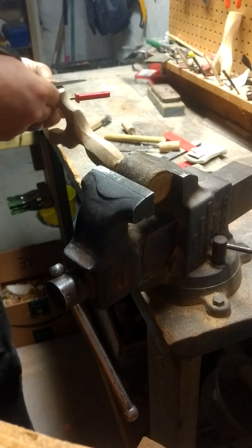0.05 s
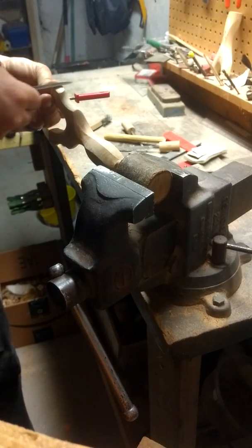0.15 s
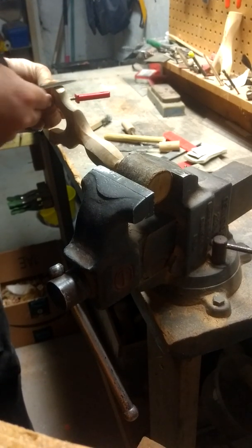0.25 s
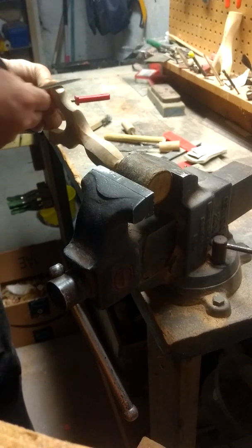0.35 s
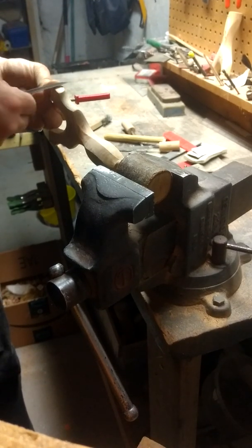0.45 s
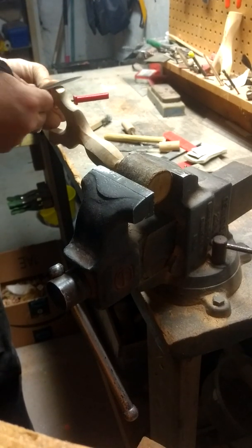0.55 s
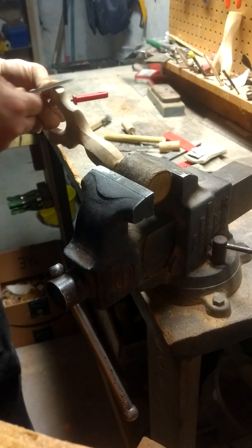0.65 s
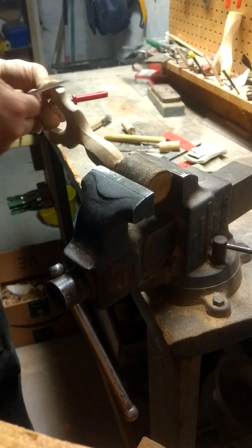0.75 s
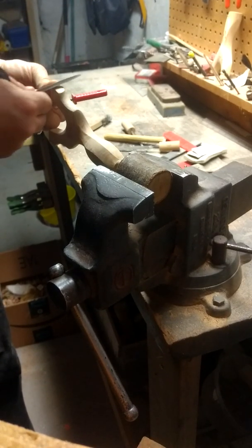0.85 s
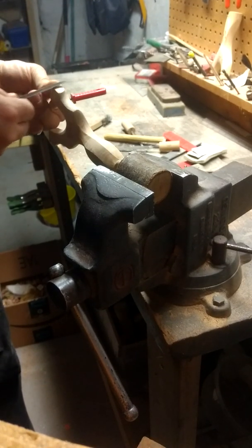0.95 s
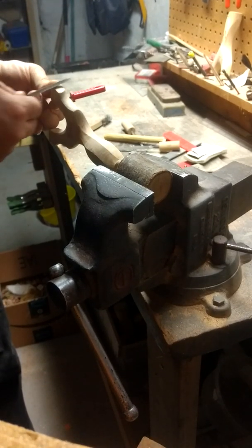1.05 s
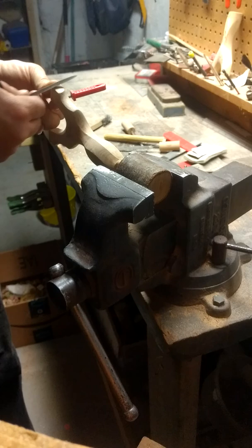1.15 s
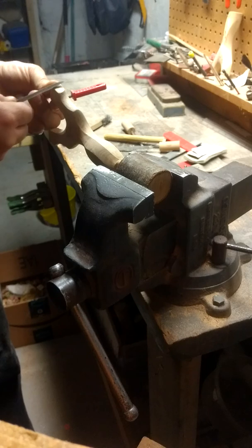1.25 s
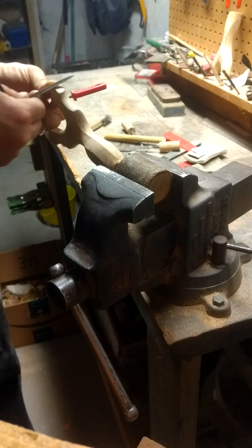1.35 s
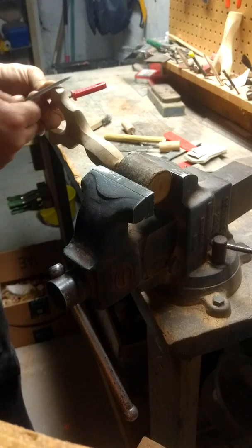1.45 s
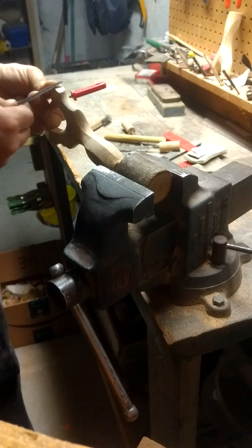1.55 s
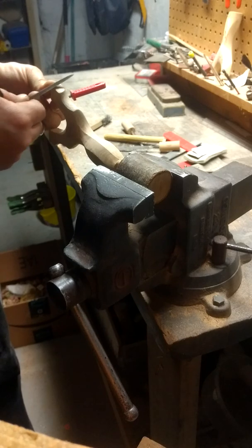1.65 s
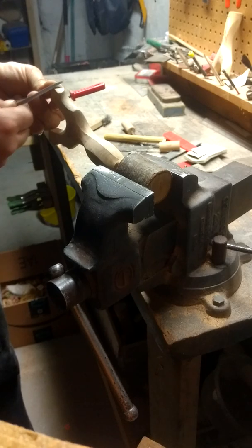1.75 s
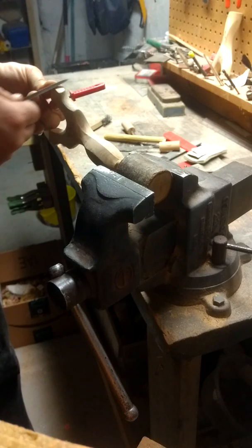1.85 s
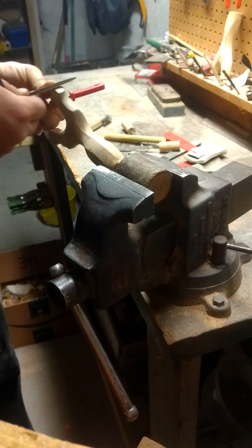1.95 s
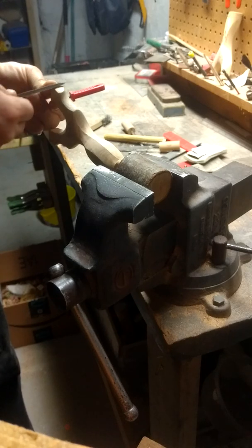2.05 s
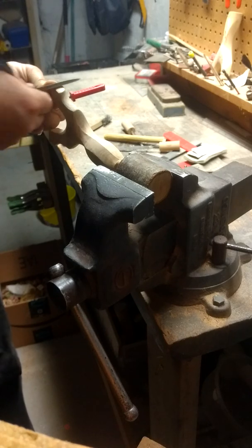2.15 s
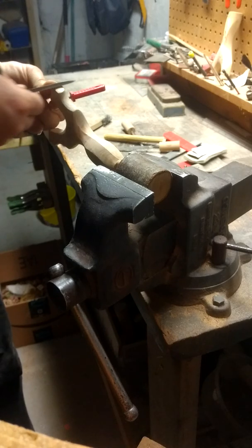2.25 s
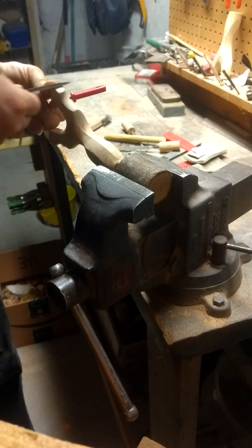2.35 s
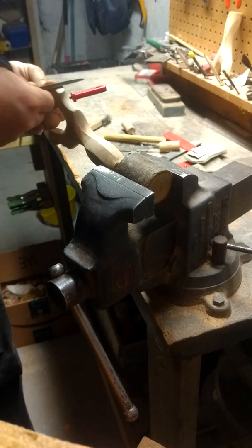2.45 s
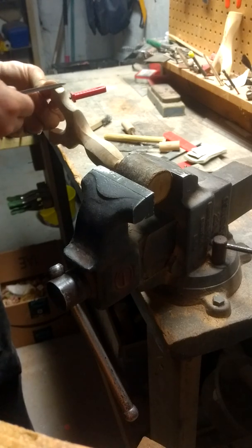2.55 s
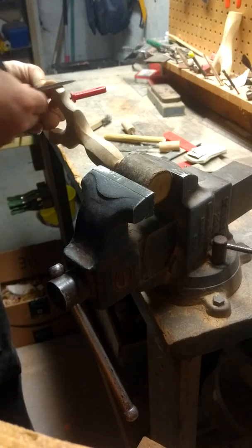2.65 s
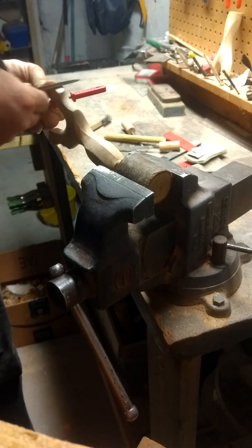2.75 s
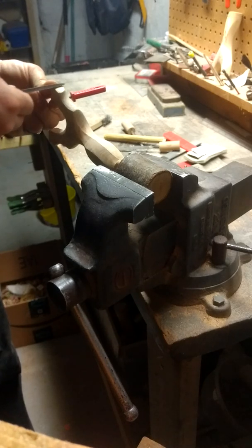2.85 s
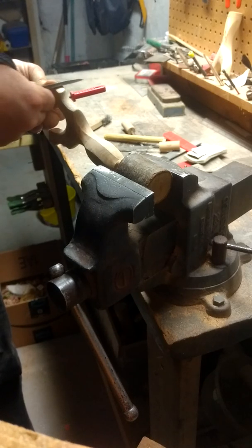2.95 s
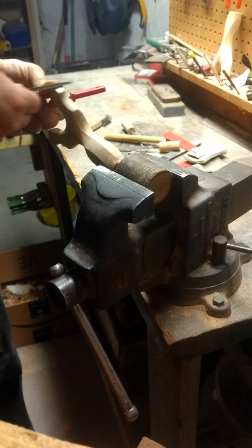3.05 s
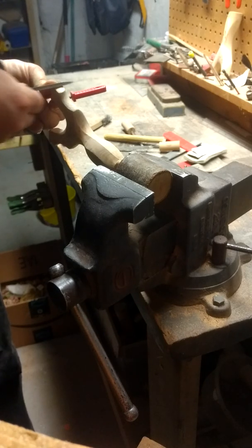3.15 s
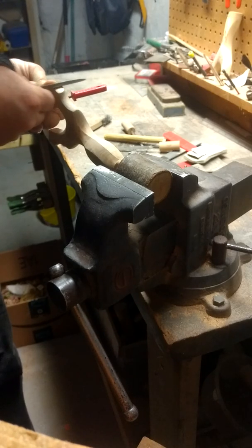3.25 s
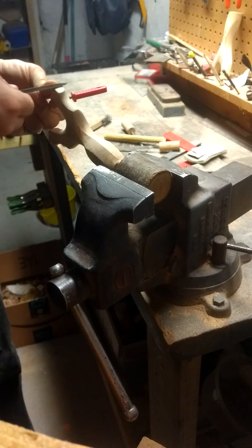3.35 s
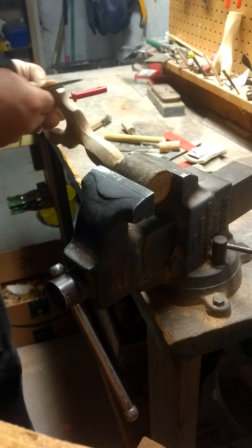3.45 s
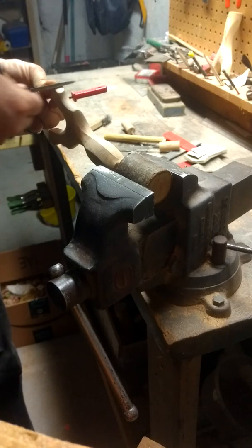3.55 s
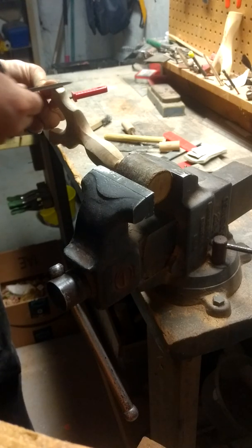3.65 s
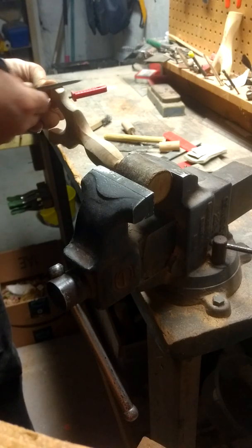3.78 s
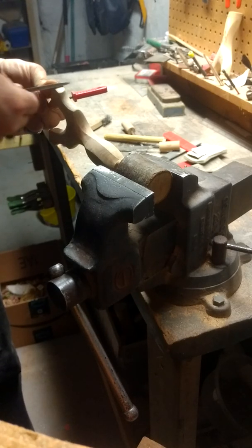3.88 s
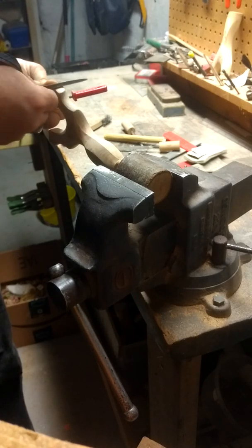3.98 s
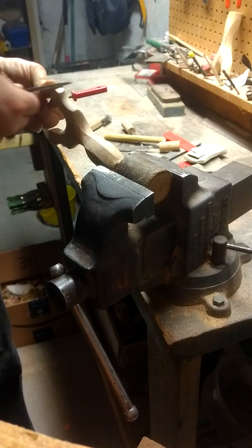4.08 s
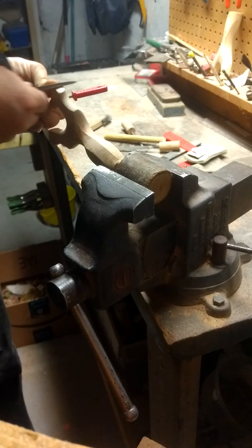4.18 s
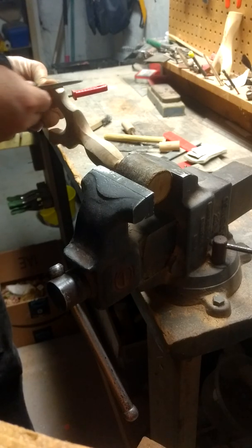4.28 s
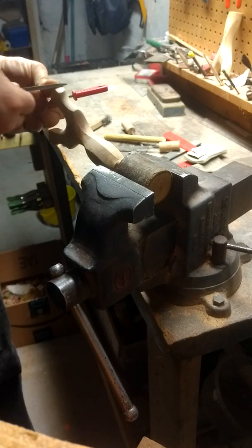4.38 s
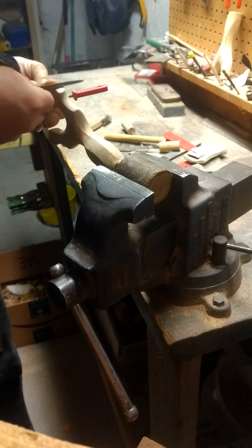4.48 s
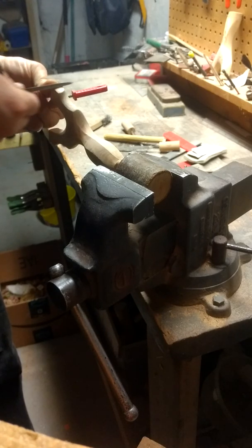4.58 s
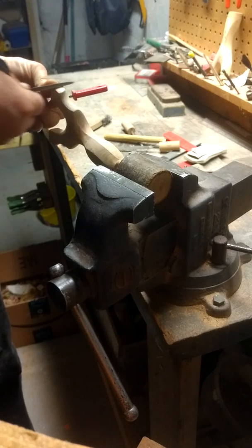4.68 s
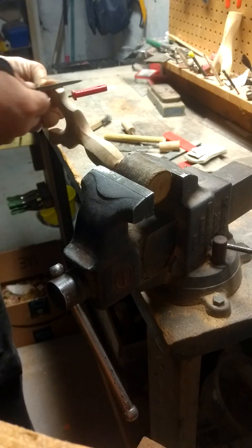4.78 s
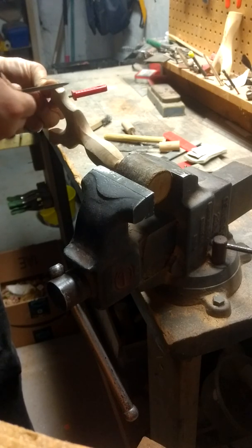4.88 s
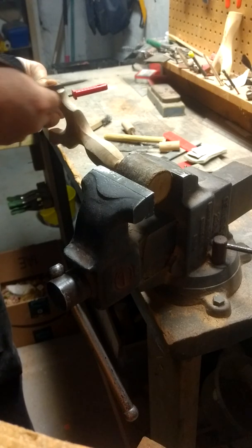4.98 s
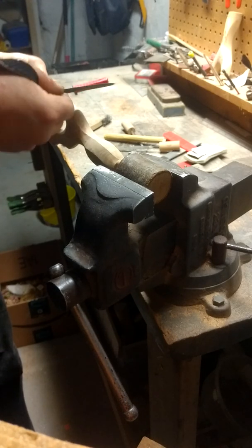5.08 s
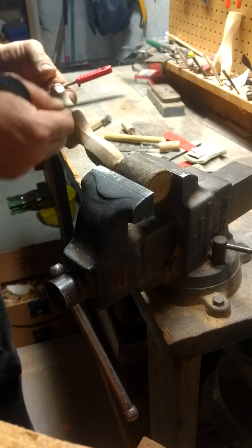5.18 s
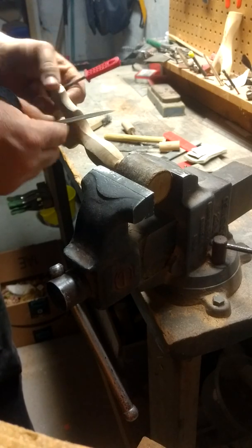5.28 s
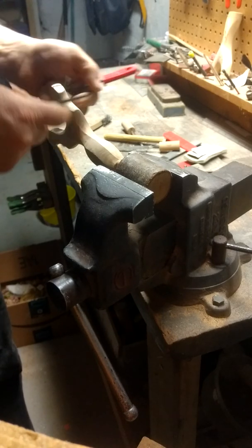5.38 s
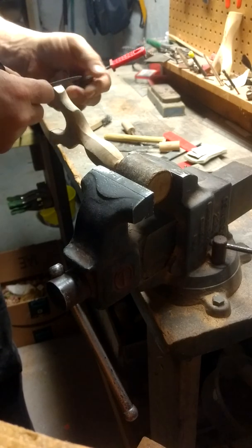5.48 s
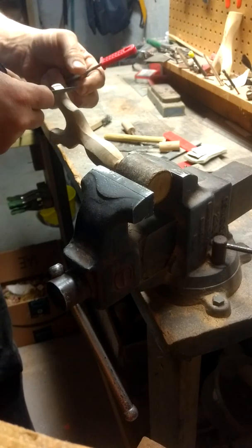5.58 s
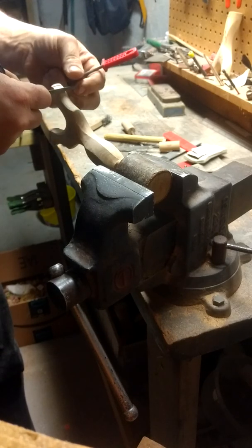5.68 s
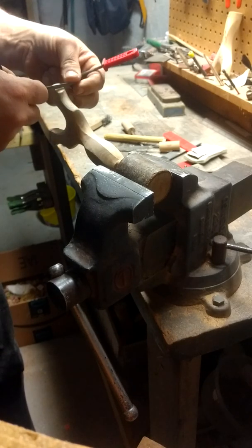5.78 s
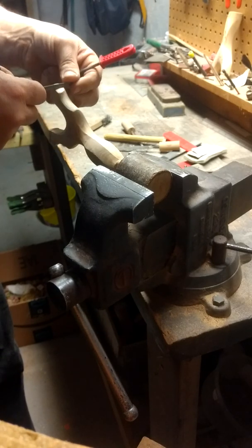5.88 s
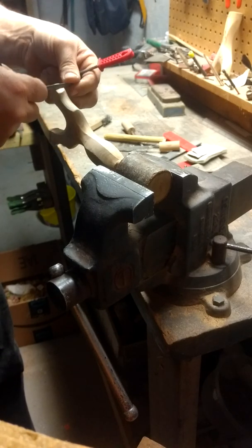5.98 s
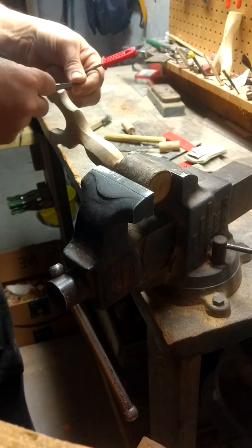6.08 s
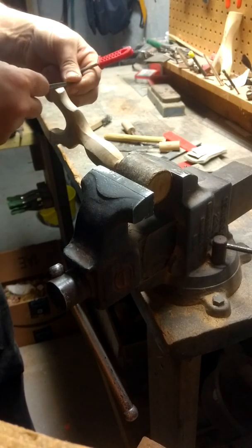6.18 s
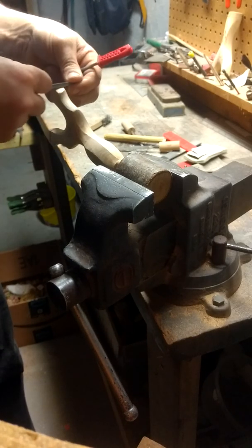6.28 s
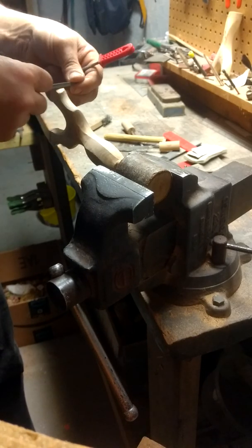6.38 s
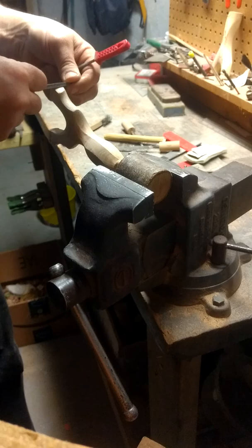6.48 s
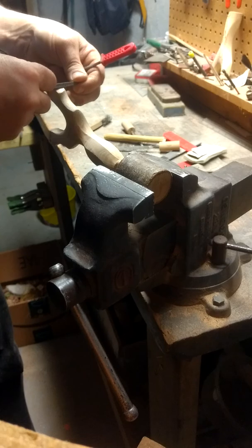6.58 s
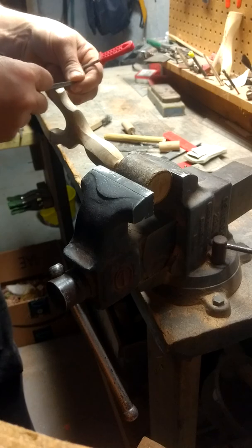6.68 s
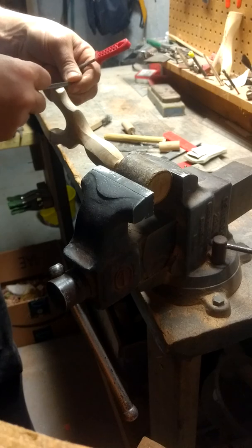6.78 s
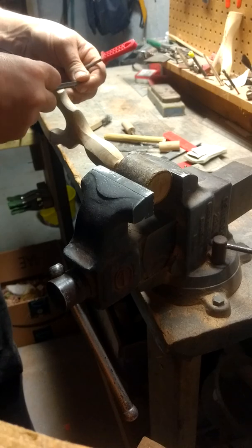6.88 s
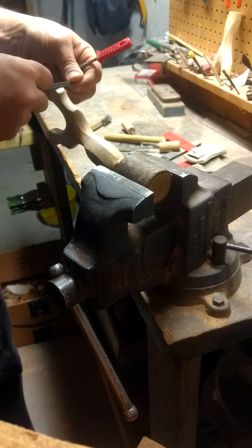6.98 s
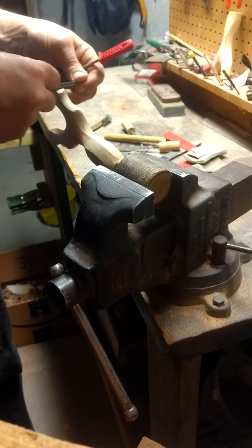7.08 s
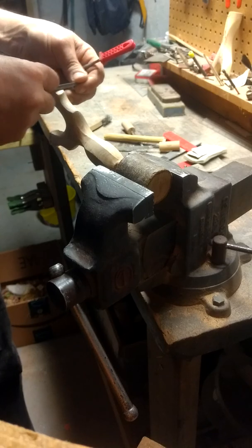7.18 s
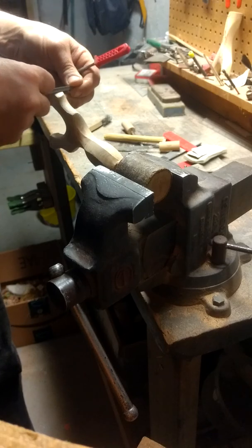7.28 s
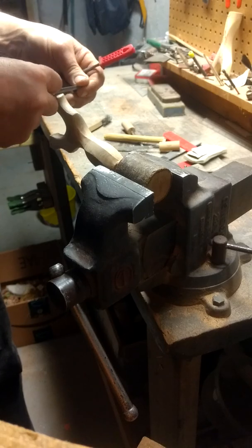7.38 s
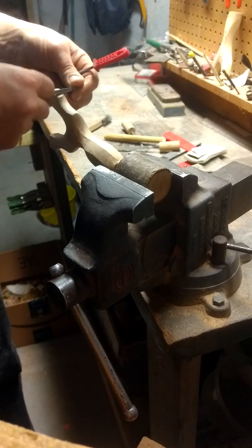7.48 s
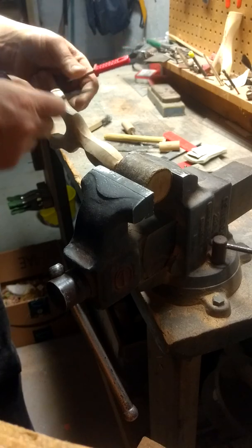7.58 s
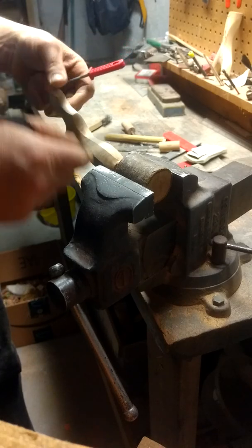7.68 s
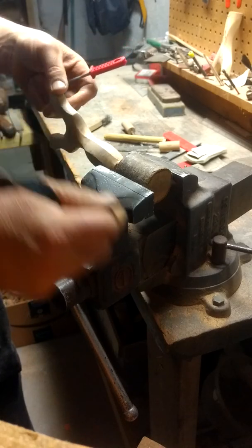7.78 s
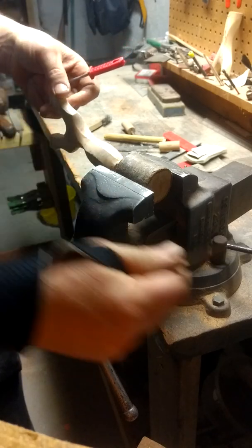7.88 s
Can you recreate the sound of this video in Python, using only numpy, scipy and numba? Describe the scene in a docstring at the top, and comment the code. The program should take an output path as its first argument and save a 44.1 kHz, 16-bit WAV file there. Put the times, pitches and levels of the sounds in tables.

```python
"""Hand file on clamped carved wood

A fine file is pushed and pulled over a carved wooden piece held in a bench vise, pauses, then goes on at a spot
where its rasp is quieter. Dense random grit is coloured into rasp and scrape; coarser grit and knocks ring
damped modes of the piece, and a burst of grit rings the file as it lifts off. A soft broad hiss sounds while
the file is lifted. Bass-heavy workshop air, short echoes and a stepped phase spread make a wide stereo picture."""
import sys
import numpy as np
from scipy import signal
from scipy.fft import rfft, irfft, next_fast_len
from scipy.io import wavfile
from scipy.ndimage import uniform_filter1d
from numba import njit

SR = 44100
rng = np.random.default_rng(int(sys.argv[2]) if len(sys.argv) > 2 else 0)


def to_wav(s):
    """Save 16-bit WAV."""
    ch = np.atleast_2d(s).T  # columns
    pcm = np.round(np.clip(ch, -1, 1) * 32767)  # PCM
    wavfile.write(sys.argv[1], SR, pcm.astype(np.int16))


N = 349713  # samples
MOVE_S = 5.25  # the hands go to the second spot
BLOCK = 32  # samples between updates of a mode
# frequency grid for the spectral filters, kept just above zero for its logarithm
HALF_SIZE = next_fast_len(N // 2 + 1)
HZ = np.arange(HALF_SIZE + 1.) * SR / 2 / HALF_SIZE + 1e-3

# file strokes, a push first at each spot, then pull and push in turn; levels before the layer trims:
# start_s [s], rasp_db [dB], ring_db [dB, ring of the piece]
STROKES = [(0.0, -42, -28.5), (0.151, -43, -34), (0.279, -42.5, -30.5), (0.403, -45.5, -37.5),
           (0.54, -42.5, -30.5), (0.659, -45.5, -33.5), (0.802, -42.5, -31), (0.937, -46, -28),
           (1.072, -45, -29.5), (1.209, -47, -35), (1.354, -43, -28), (1.483, -47, -30),
           (1.627, -43.5, -29), (1.75, -46, -31), (1.888, -41.5, -29), (2.015, -47.5, -32),
           (2.145, -42, -31), (2.28, -43.5, -32), (2.404, -40.5, -30.5), (2.527, -43, -32),
           (2.672, -39.5, -30), (2.804, -42, -36.5), (2.942, -38.5, -30), (3.057, -43.5, -33),
           (3.193, -39, -28), (3.325, -41, -35), (3.45, -39, -30.5), (3.578, -41, -32.5), (3.701, -39, -25),
           (3.833, -42, -30.5), (3.958, -38.5, -27.5), (4.082, -41, -32), (4.214, -39, -26.5),
           (4.343, -41, -30), (4.475, -39, -25), (4.587, -42.5, -31.5), (4.724, -39, -25),
           (4.844, -43.5, -31.5), (4.968, -39, -28), (6.053, -58, -38.5), (6.195, -57.5, -36.5),
           (6.328, -52, -31.5), (6.463, -58, -35.5), (6.594, -46.5, -24.5), (6.712, -53.5, -31),
           (6.854, -48.5, -26), (7.004, -55.5, -33.5), (7.12, -48.5, -24.5), (7.24, -52, -30),
           (7.352, -50.5, -29.5), (7.503, -57, -42)]
# stereo tilt: frequency_hz [Hz], left_minus_right_db [dB]
LEFT_TILT = [(40, -4.5), (90, 3.5), (250, 7), (450, 1), (1200, -2.5), (2500, 1.5), (5000, 2.5), (9000, -3),
             (16000, 0)]


def undb(db):
    """Decibels to an amplitude factor."""
    return 10 ** (np.asarray(db) / 20)


def unit(x):
    """Scale to an RMS of 1."""
    return x / np.sqrt(np.mean(x ** 2))


def shape(points):
    """Value at every frequency from (Hz, value) points, straight over log frequency."""
    hz, value = np.transpose(points)
    return np.interp(np.log(HZ), np.log(hz), value)


def colour(x, db, turn=0):
    """Filter by a level in dB and a phase turn in radians at every frequency."""
    size = 2 * len(HZ) - 2
    response = undb(db) * np.exp(1j * turn)
    return irfft(rfft(x, size) * response, size)[:N]


def walk(rate, step=1):
    """Random levels held 1 / rate s and slewed twice, read every step samples; spread near 1."""
    held = np.repeat(rng.standard_normal(int(N / SR * rate) + 2), 8)
    slewed = 1.3 * uniform_filter1d(uniform_filter1d(held, 8), 8)
    return np.interp(np.arange(0, N, step) * (8 * rate / SR), np.arange(len(slewed)), slewed)


def grit(rate, scatter_db):
    """Clicks at random moments, as of tearing fibres, rate per second, a few much harder than the rest."""
    tear = rng.random(N) < rate / SR
    hardness = undb(scatter_db * rng.exponential(size=N))
    return unit(tear * rng.standard_normal(N) * hardness)


@njit
def mode(x, pole, gain, block):
    """One damped mode as a complex resonator; pole and drive gain change block by block."""
    y, z = np.empty(len(x)), 0j
    for i in range(len(x)):
        z = z * pole[i // block] + gain[i // block] * x[i] + 1e-18
        y[i] = z.imag
    return y


def ring(x, modes, grip, drift, patchy_db):
    """Sum of modes, signs alternating; the grip damps and detunes them, the contact favours now one, now another."""
    out = 0
    grip = grip[::BLOCK]
    moved = np.arange(0, N, BLOCK) > MOVE_S * SR
    for k, (hz, t60, *spot_db) in enumerate(modes):
        db = np.where(moved, spot_db[-1], spot_db[0]) + patchy_db * walk(12, BLOCK)
        pitch = hz * (1 + drift * grip * walk(9, BLOCK))
        decay = np.log(1000) / (t60 * (1 - grip) * SR)
        pole = np.exp(2j * np.pi * pitch / SR - decay)
        gain = undb(db) / np.sqrt(t60 * SR)
        out = out + (-1) ** k * mode(x, pole, gain, BLOCK)
    return out


def effort(sharp, rest):
    """Gains in time of rasp, scrape, ring and sway: each stroke speeds up, tops and slows; rest stays at the turns."""
    # hand movement, spot by spot, push then pull: top_place [0-1 of the stroke],
    # moving_share [of the time to the next stroke], peaked [power of the speed],
    # scrape_db [dB above the mean of rasp and ring], sway_db [dB above the ring]
    gait = [
        [(.33, .96, 1.02, -7.5, 0.5), (.42, .96, 1, -7, 0.1)],
        [(.45, 0.925, 1.4, -2.5, 2), (0.3, 0.94, 0.71, -5.5, -1.5)],
    ]
    # slow change of the sway, added to its level above: time_s [s], level_db [dB]
    sway_curve = [(0, -12), (.4, -10.5), (.6, -5.5), (1.1, -6), (1.8, -7.5), (2.7, -9), (3.45, -3),
                  (3.75, -11), (4.1, -6), (4.5, -12), (4.75, -7), (5.1, -12.5), (6.05, -4), (6.7, -6),
                  (7, -10.5), (7.6, -5.5)]
    last_room_s = .14  # time given to the last stroke at each spot
    out = np.zeros((4, N))
    first = sum(s < MOVE_S for s, *_ in STROKES)  # strokes at the first spot
    for k, (s, rasp_db, ring_db) in enumerate(STROKES):
        spot = int(k >= first)
        top, moving, peaked, scrape_db, sway_db = gait[spot][(k - spot * first) % 2]
        is_last = k + 1 in (first, len(STROKES))
        room_s = last_room_s if is_last else STROKES[k + 1][0] - s
        i, n = int(s * SR), int(min(moving, 1) * room_s * SR)
        way = np.interp(np.arange(n) / n, [0, np.clip(top, .1, .9), 1], [0, .5, 1])
        speed = rest + (1 - rest) * np.sin(np.pi * way) ** sharp
        sway_db = ring_db + sway_db + np.interp(s, *np.transpose(sway_curve))
        db = [rasp_db, (rasp_db + ring_db) / 2 + scrape_db, ring_db, sway_db]
        out[:, i:i + n] = undb(db)[:, None] * unit(speed ** peaked)
    return uniform_filter1d(out, 300)


def peaks(shift):
    """Resonant peaks in dB at every frequency, all moved by a factor."""
    # file and piece together: centre_hz [Hz, before the shift], width_hz [Hz, at half the dB], height_db [dB]
    contact_peaks = [(1043, 71, 3.5), (1238, 160, 5.5), (1526, 130, 6), (1830, 96, 7), (2046, 76, 10.5),
                     (2500, 195, 10.5), (2980, 64, 3.5), (3430, 253, 9), (4670, 184, 13.5), (6420, 490, 11),
                     (8050, 640, 11), (12800, 630, 6.5)]
    return sum(db / (1 + (2 * (HZ - hz * shift) / width) ** 2) for hz, width, db in contact_peaks)


def blows(growth):
    """One impulse for each knock, its level growing by growth dB per dB."""
    # teeth catch, or the file touches down: time_s [s], level_db [dB, before growth and layer trims]
    knocks = [(0.038, -37), (1.139, -12), (1.507, -14.5), (1.789, -28), (2.08, -18), (2.226, -17.5),
              (2.491, -12.5), (2.565, -19), (2.683, -18), (3.228, -15), (3.473, -25.5), (3.724, -16),
              (4.51, -14), (4.557, -11), (4.748, -18), (5.014, -13.5), (5.398, -28), (5.645, -50),
              (5.744, -40.5), (5.896, -48), (6.079, -41.5), (6.378, -14.5), (6.62, -11), (6.655, -11),
              (6.894, -15), (7.128, -31), (7.387, -11)]
    out = np.zeros(N)
    for s, db in knocks:
        out[int(s * SR)] = undb(growth * db)
    return out


def filing():
    """Fine grit heard as a high rasp and a lower scrape, both with the peaks of file and piece."""
    # spectra of the two layers: frequency_hz [Hz], density_db [dB per Hz, relative]
    rasp_tone = [(1200, -24), (1700, -4), (2400, -3), (4500, -10), (5300, -16.5), (7100, -25), (10500, -36),
                 (13000, -35.5), (16000, -35.5)]
    scrape_tone = [(55, -14), (88, 4.5), (150, -5), (400, 6), (900, 4.5), (1500, -2.5), (1900, -16.5),
                   (3000, -59)]
    rasp, scrape, _, _ = effort(1.36, 0.19)
    teeth = grit(7000, 1.2) * undb(1.37 * walk(40))
    # the peaks sit lower or higher as another part of the file bears on the wood
    part = np.pi / 4 * (1 + np.tanh(walk(7.8)))
    low, high = (unit(colour(teeth, shape(rasp_tone) + peaks(shift))) for shift in (.985, 1.015))
    blend = np.cos(part) * low + np.sin(part) * high
    grain = blend / (np.cos(part) + np.sin(part)) ** 0.75
    # each knock spits a short tick of the same grit, with a 13 ms decay constant
    tick_gain = signal.lfilter([1], [1, -np.exp(-1 / (0.013 * SR))], blows(.45)) * undb(-42)
    scrape_grain = unit(colour(grit(5000, 1.3), shape(scrape_tone) + peaks(1)))
    return (rasp * undb(0.64) + tick_gain) * grain + scrape * scrape_grain * undb(2)


def contact(first, second):
    """How firmly file and hand hold the piece, 0-1, while strokes last at either spot."""
    touch = np.zeros(N)
    for s, *_ in STROKES:
        touch[int(s * SR):int((s + .24) * SR)] = first if s < MOVE_S else second
    return np.clip(uniform_filter1d(touch, 900), 0, .9)


def piece():
    """Coarse grit and knocks shake the modes of the piece; a firmer hold shortens and detunes them."""
    # modes of the clamped piece: pitch_hz [Hz, undrifted], t60_s [s, ungripped],
    # first_spot_db [dB], second_spot_db [dB], both before patchiness and drive
    wood = [(192.7, 0.23, -6, -9), (229.2, 0.22, 0.5, -1), (293.3, 0.32, -3.5, 1), (331, 0.17, -12, -10),
            (482.4, 0.15, -15.5, -16.5), (566, 0.31, 1, -4), (622, 0.14, -2, -4.5), (657.5, 0.35, -3, -6),
            (687.2, 0.54, -1, -2.5), (738.5, 0.17, -8.5, -12.5), (794, .15, -15.5, -19.5),
            (854.4, 0.25, -14.5, -16.5), (907, 0.29, -19.5, -19.5)]
    sway_hz = 400  # below this the piece bends as a whole
    _, _, ring_gain, sway_gain = effort(0.48, 0.68)
    push = signal.fftconvolve(blows(1), np.hanning(20) / 10)[:N]  # knocks softened to brief pulses
    high = [m for m in wood if m[0] > sway_hz]
    low = [m for m in wood if m[0] <= sway_hz]
    grip = contact(0.59, 0.41)
    ring_drive = ring_gain * grit(1500, 1.62) * undb(10 + 1.55 * walk(25)) + push * undb(30)
    sway_drive = sway_gain * grit(500, 2.0) * undb(11.5) + push * undb(23)
    rings = ring(ring_drive, high, grip, 0.017, patchy_db=1.1)
    sways = ring(sway_drive, low, grip, 0.034, patchy_db=2.0)
    # ring of the piece, kept free of deep bass and softened at the top
    return colour(rings + sways, shape([(40, -33), (170, 2.5), (1000, 3), (3000, -15.5)]))


def widen(x):
    """Wide stereo: the phase between the sides steps between alike and opposite, with a level tilt."""
    # phase turned over on the right: frequency_hz [Hz], turn_share [of a half turn, before the steps]
    turn_over = [(30, .4), (220, .47), (350, .42), (600, .63), (1100, 1), (16000, 1)]
    # bands where the phase changes sign: low_hz [Hz], high_hz [Hz]
    left_leads = [(4450, 6650), (13400, 16000)]
    lag_s, cling = .00045, .42  # lag before the steps; depth of the steps in radians
    turn = 2 * np.pi * HZ * lag_s - np.pi * shape(turn_over)
    turn = turn - cling * np.sin(2 * turn)  # bends the phase slope into steps
    for lo, hi in left_leads:
        turn = np.where((HZ > lo) & (HZ < hi), -turn, turn)
    tilt = shape(LEFT_TILT) / 2
    return np.array([colour(x, tilt), colour(x, -tilt, turn)])


def room(x):
    """Diffuse echoes as decaying noise, another set for each side, slightly dulled."""
    t60_s, level_db = 0.18, -8
    t = np.arange(int(.8 * SR)) / SR
    decay = np.exp(-np.log(1000) * t / t60_s)
    tails = rng.standard_normal((2, len(t))) * decay * (t > .004)
    tails = signal.lfilter([1], [1, -.25], tails)
    tails = signal.lfilter([1, -1], [1, -.975], tails)  # little deep bass returns
    tails = tails / np.sqrt(np.sum(tails ** 2) / 2)
    return undb(level_db) * signal.fftconvolve(x[None], tails, axes=1)[:, :N]


def shop():
    """Steady air noise that wavers a little; the sides share its middle, not its bass."""
    # air spectrum: frequency_hz [Hz], density_db [dB per Hz, relative]
    air_tone = [(25, -32), (70, 1), (200, -5), (450, -12.5), (680, -10), (900, -12), (1250, -9.5),
                (1600, -23), (3500, -27.5), (6000, -33.5), (10000, -44.5), (13500, -39.5), (16000, -34)]
    noise = [colour(rng.standard_normal(N), shape(air_tone)) * undb(1.1 * walk(2.1)) for _ in range(3)]
    shared_db = shape([(60, -24.0), (300, -2.0), (700, -0.5), (2000, -0.5), (16000, -2.0)])
    # each side's own noise fills the power that is not shared
    own_db = 10 * np.log10(1 - np.clip(undb(2 * shared_db), 0, .98))
    tilt = shape(LEFT_TILT) / 2
    apart = [colour(noise[1], own_db + tilt), colour(noise[2], own_db - tilt)]
    return undb(-52.5) * unit(widen(colour(noise[0], shared_db)) + apart)


def lift():
    """The last teeth skip off the edge and leave the file ringing free."""
    # modes of the free file: pitch_hz [Hz], t60_s [s], level_db [dB, before the layer trim]
    file_modes = [(774, .06, 0.5), (826, .16, -4), (861, 0.19, 1), (2060, .18, -23)]
    t = np.arange(N) / SR - 5.09  # seconds from the lift
    skip = grit(1100, 1.5) * np.exp(-abs(t) / np.where(t < 0, .025, .045))
    return ring(skip, file_modes, np.zeros(N), 0, 0) * undb(-18)


def lifted_hiss():
    """Soft broad hiss while the file is lifted, with a short knock tick at 5.4 s."""
    # two level curves, one per passage: time_s [s], level_db [dB, before smoothing and trim]
    passages = [
        [(5.1, -62.5), (5.138, -55.5), (5.374, -62.5), (5.402, -46.5), (5.424, -59), (5.698, -76.5), (5.8, -84)],
        [(7.6, -79), (7.678, -87), (7.698, -60.5), (7.79, -79), (7.93, -68)],
    ]
    # hiss spectrum: frequency_hz [Hz], density_db [dB per Hz, relative]
    hiss_tone = [(800, -19), (1800, -3), (3400, 1.5), (4200, -3), (5200, -5), (6500, -18), (12000, -28)]
    t = np.arange(N) / SR
    gain = sum(undb(np.interp(t, *np.transpose(part), -120, -120)) for part in passages)
    hiss = unit(colour(grit(6000, 1.2), shape(hiss_tone)))
    return uniform_filter1d(gain, 900) * hiss * undb(-0.5)


def scene():
    """Bench sounds spread wide, with their echoes and the workshop air."""
    bench = filing() + piece() + lift() + lifted_hiss()
    return widen(bench) + room(bench) + shop()


def record(dry):
    """A small constant offset joins the left side, then a steep low-pass cuts the top."""
    offset, top_hz = .0078, 15740  # full scale, ahead of the filter; Hz
    low_pass = signal.ellip(14, .3, 90, top_hz, fs=SR, output="sos")
    return signal.sosfilt(low_pass, dry + np.array([[offset], [0]]))


dry = scene()
out = record(dry)
to_wav(out)
```